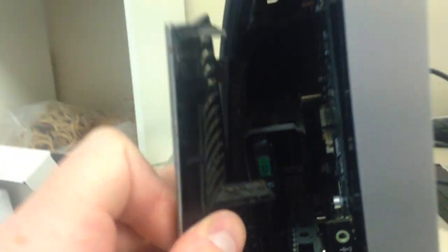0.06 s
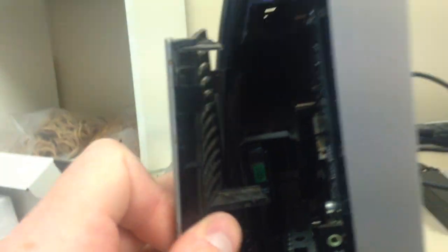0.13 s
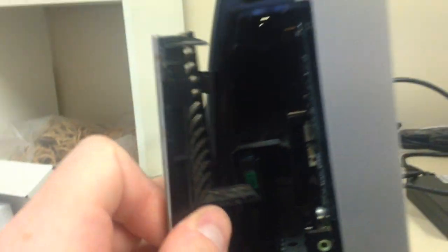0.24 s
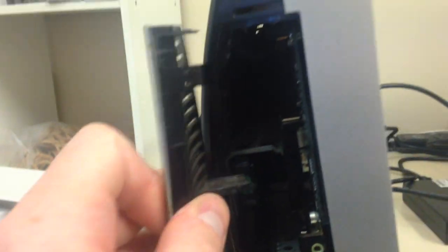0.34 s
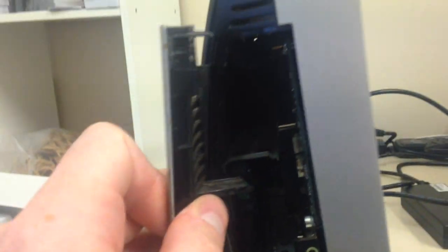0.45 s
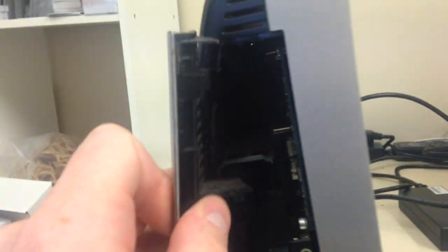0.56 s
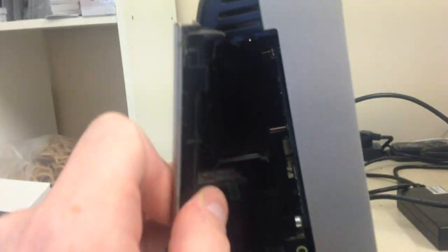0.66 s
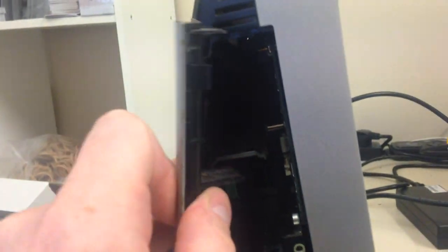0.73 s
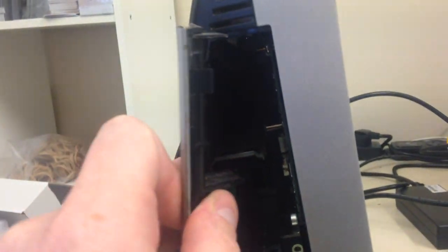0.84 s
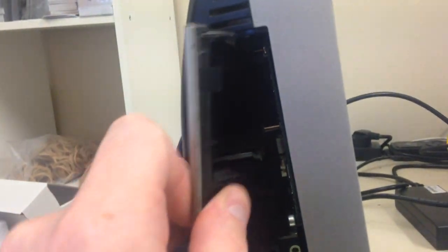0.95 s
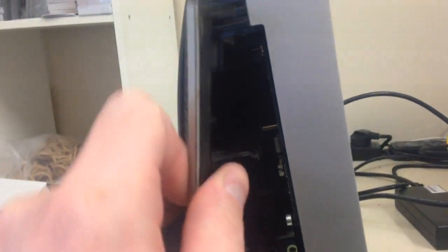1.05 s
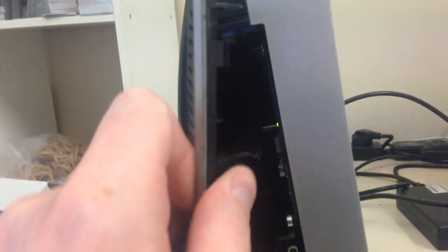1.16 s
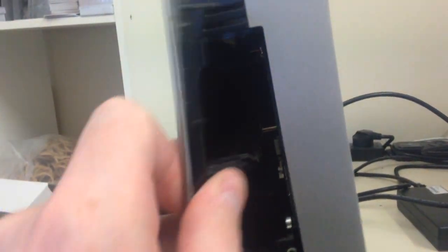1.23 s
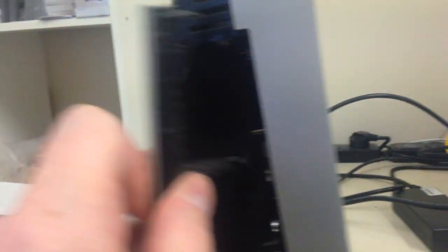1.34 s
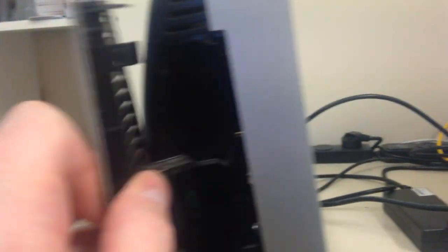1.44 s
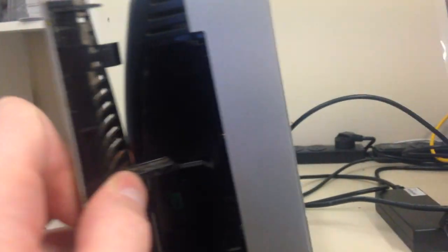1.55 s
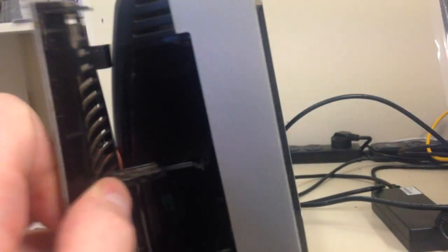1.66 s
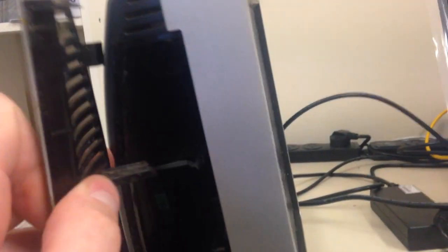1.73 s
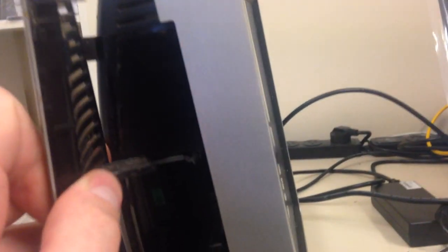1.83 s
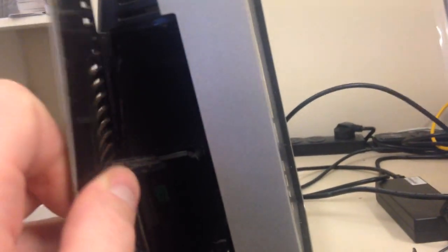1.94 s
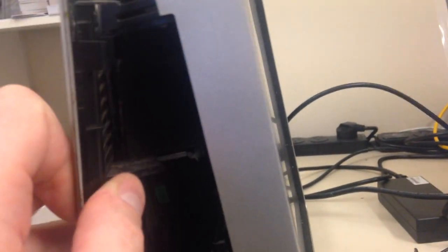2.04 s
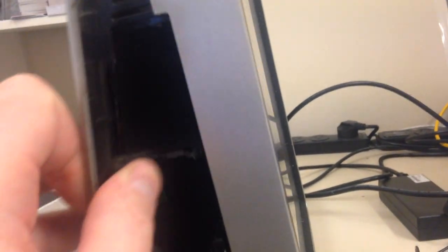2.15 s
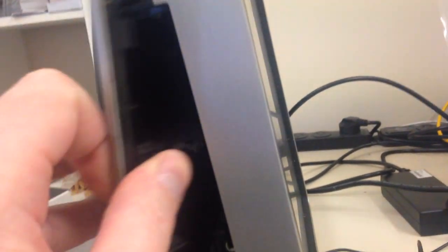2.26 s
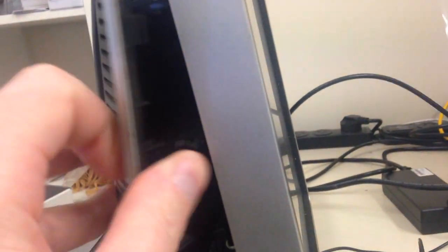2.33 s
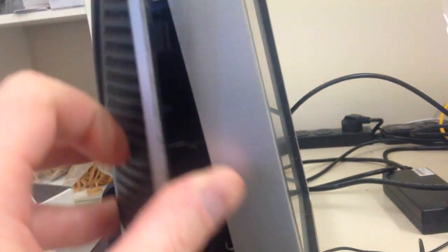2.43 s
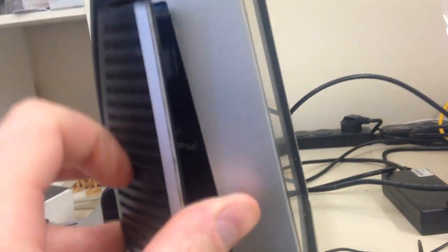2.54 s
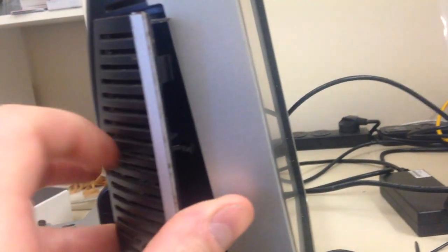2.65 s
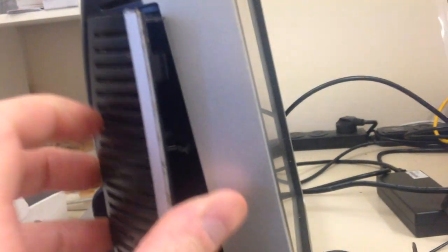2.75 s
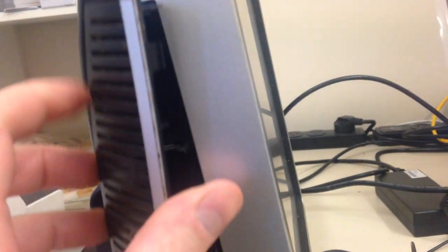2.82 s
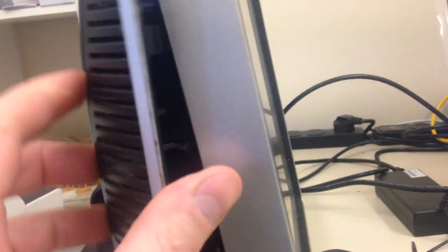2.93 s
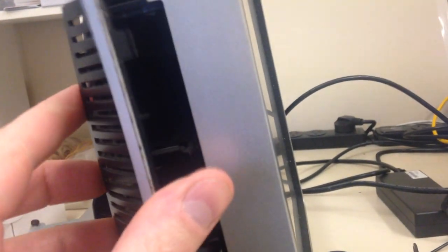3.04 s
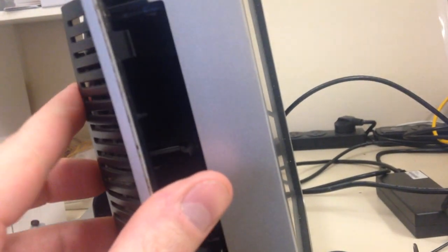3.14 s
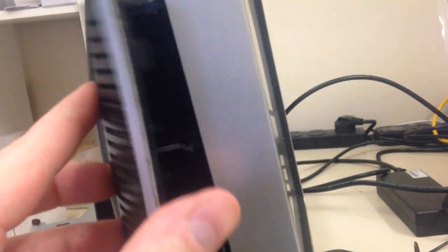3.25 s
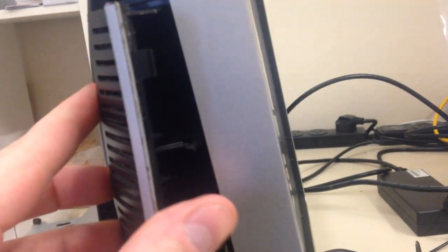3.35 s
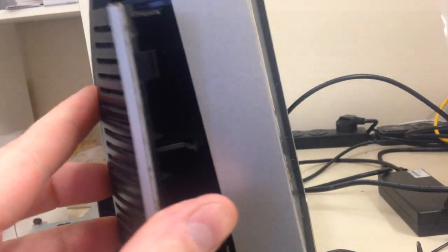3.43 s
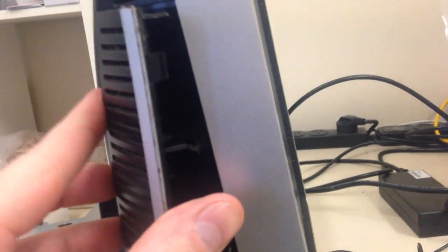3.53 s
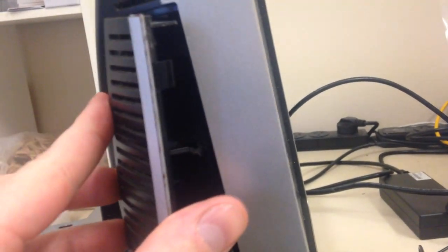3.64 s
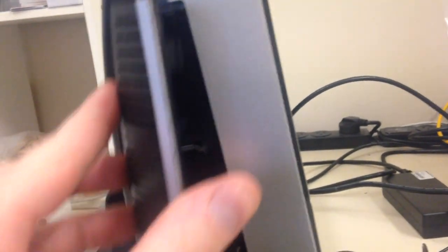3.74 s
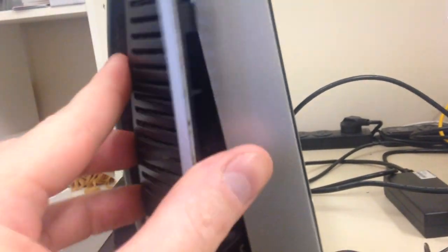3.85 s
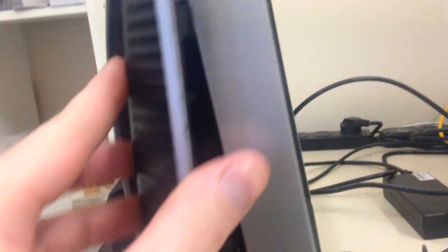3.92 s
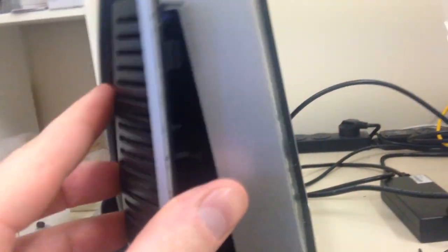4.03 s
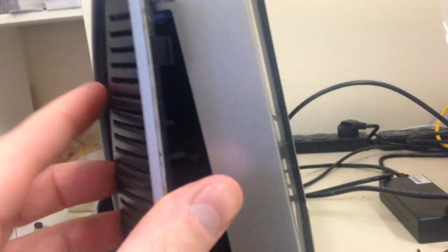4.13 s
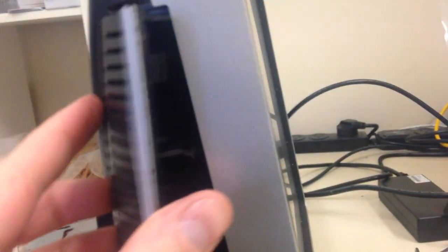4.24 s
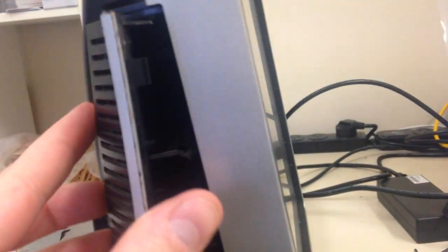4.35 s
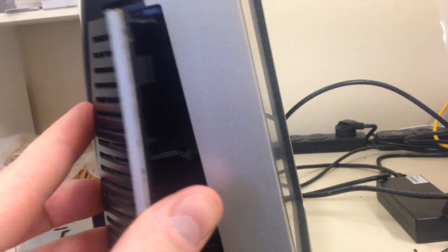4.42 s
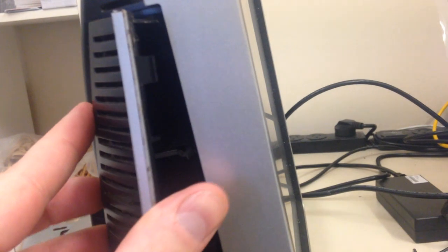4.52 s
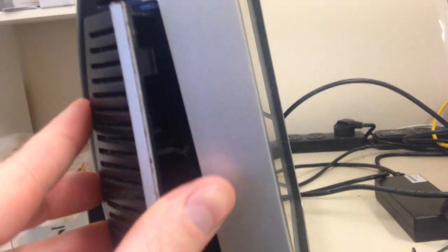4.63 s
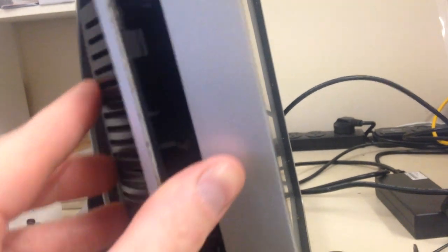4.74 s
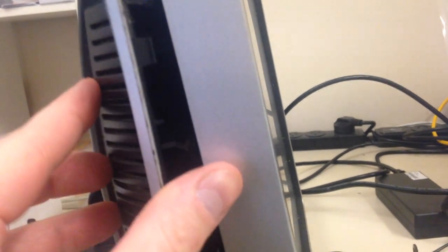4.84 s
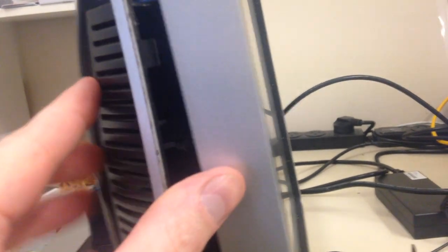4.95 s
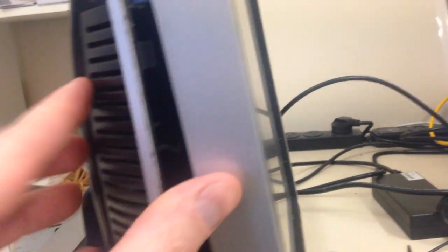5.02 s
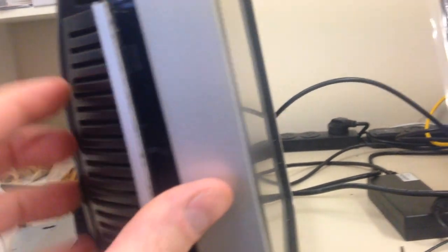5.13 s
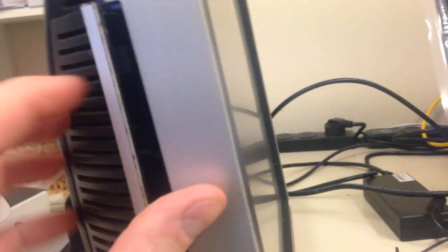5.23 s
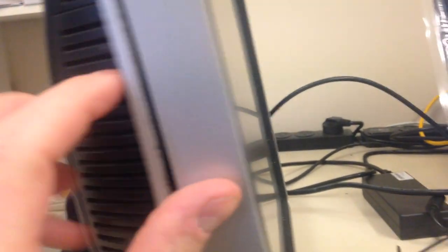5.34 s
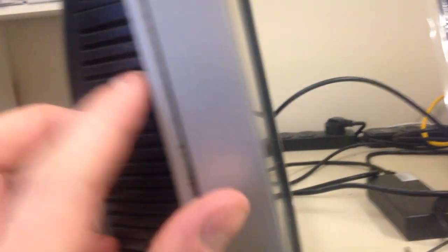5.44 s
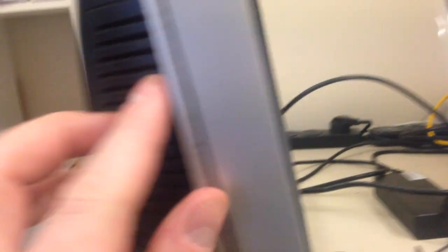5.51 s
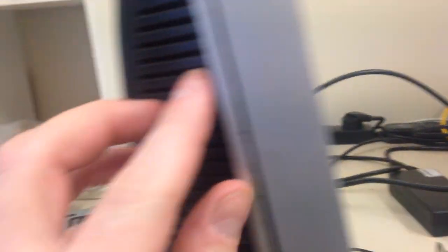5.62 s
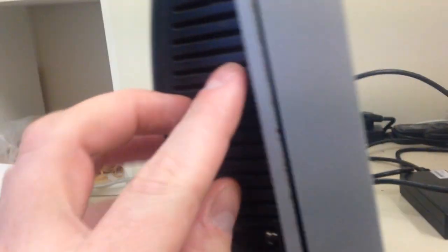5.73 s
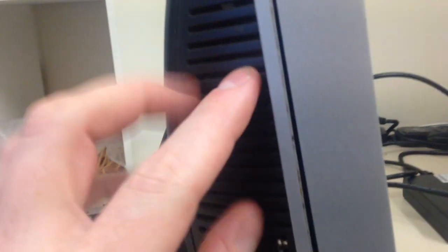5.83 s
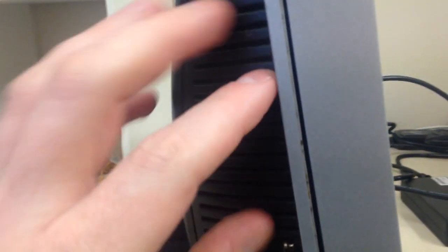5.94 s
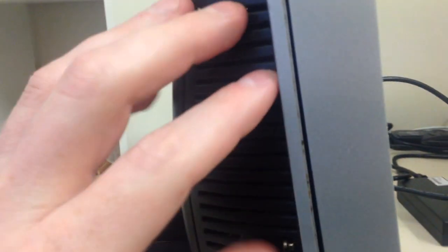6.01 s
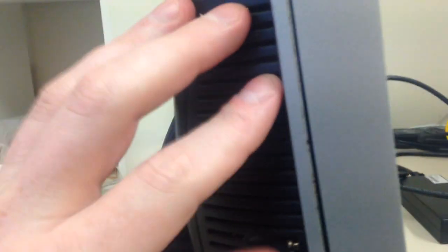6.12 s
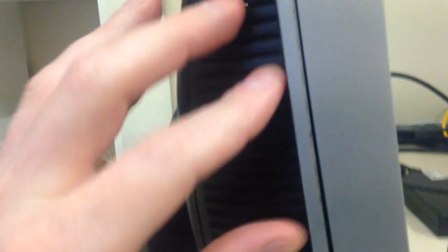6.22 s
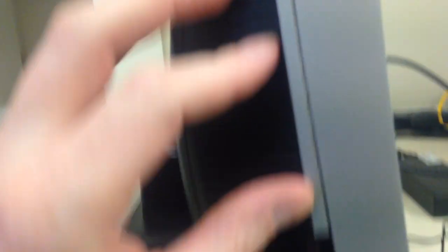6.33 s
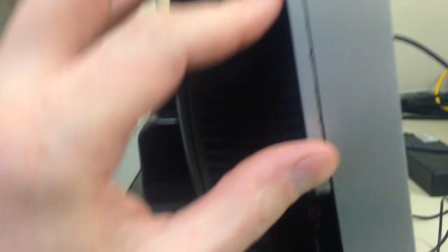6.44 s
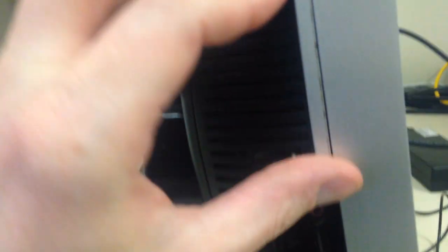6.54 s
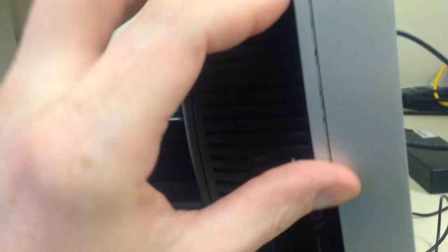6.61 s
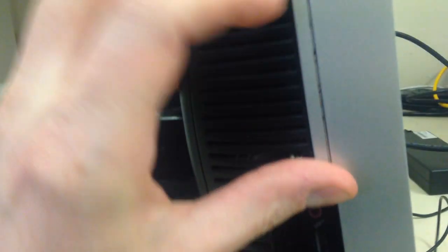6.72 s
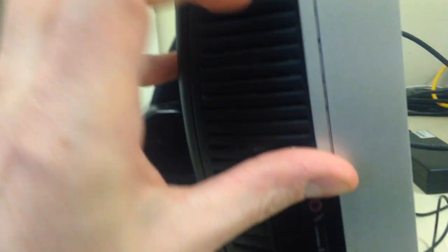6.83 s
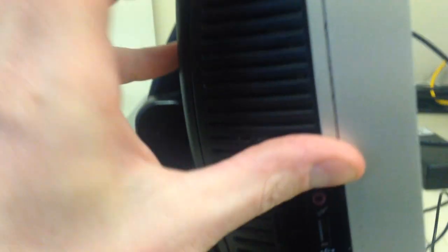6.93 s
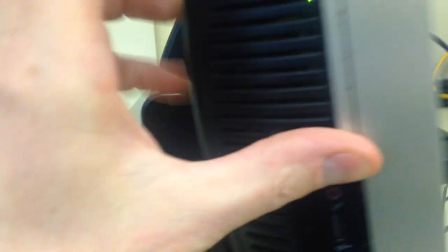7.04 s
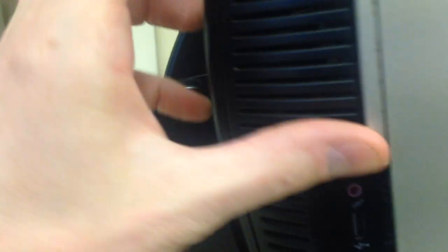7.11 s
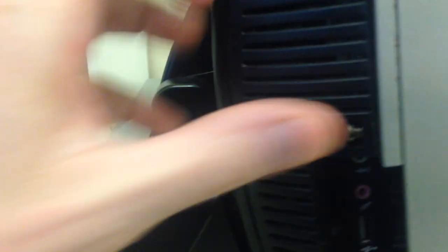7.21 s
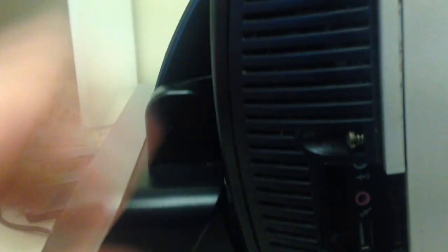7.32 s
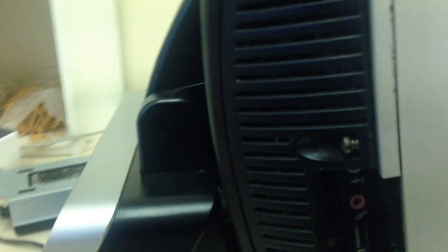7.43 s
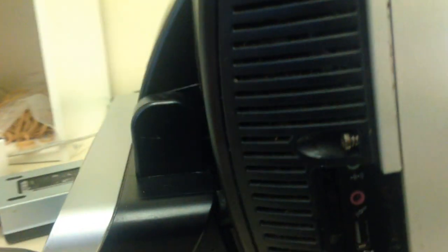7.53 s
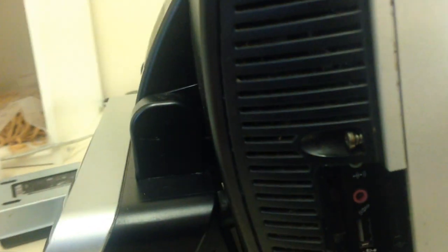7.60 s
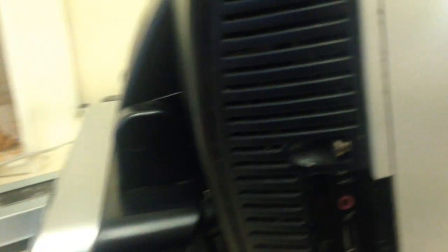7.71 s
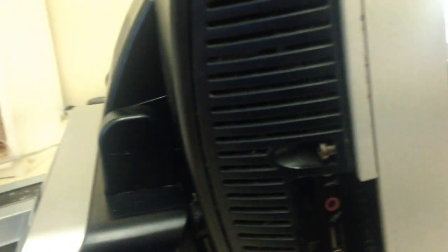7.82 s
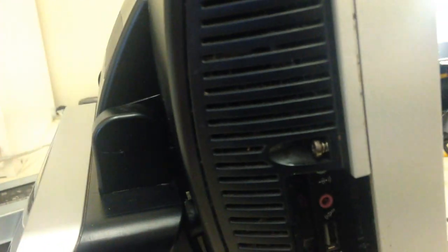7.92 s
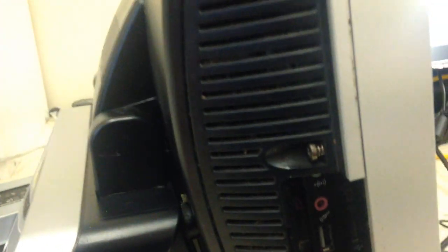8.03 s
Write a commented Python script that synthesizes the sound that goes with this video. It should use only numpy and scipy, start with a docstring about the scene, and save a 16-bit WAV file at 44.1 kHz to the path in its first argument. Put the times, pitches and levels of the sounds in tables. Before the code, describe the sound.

A hand works a plastic cover onto a computer case, heard by a close microphone with short room reflections. Dry ticks, brief scrapes and soft skin rubs come unevenly, growing into strong clacks with dull casing thumps as it is pressed home. After the last clicks only low room noise, a slowly beating hum and a faint distant bump remain.

```python
"""A soft whir and light scraping come first: a plastic side panel is slid onto a computer casing and pressed home.
Scrapes are trains of tiny stick-slip pushes; each click is one sharp push after a faint, quickly swelling noise.
Both excite damped panel modes; thumps are decaying sines of the swaying casing.
Finger rubbing and scuffs are coloured, modulated noise.
Dull bumps, a faint beating hum and room noise lie underneath, in a small close-sounding room."""
import sys
import numpy as np
from scipy import signal
from scipy.fft import rfft, irfft, next_fast_len
from scipy.io import wavfile
from scipy.ndimage import uniform_filter1d, map_coordinates

SR = 44100
rng = np.random.default_rng(int(sys.argv[2]) if len(sys.argv) > 2 else 0)


def inscribe(sig):
    """Save sig as 16-bit PCM at rate SR to the path in sys.argv[1].

    A 1-D sig is mono; a 2-D sig holds one channel per row.
    Samples are clipped to [-1, 1] before scaling.
    """
    pcm = np.round(np.clip(np.atleast_2d(sig).T, -1, 1) * 32767)
    wavfile.write(sys.argv[1], SR, pcm.astype(np.int16))


N = 355887

# Levels in the event tables are relative: each layer may add its own trim.
# spectra of noise, later scaled to a common rms: pitch_hz, density_db (relative, per Hz)
AIR_COLOUR = [(28, -35), (45, -1), (64, -13.5), (84, 1.5), (105, -2.5), (145, -9), (210, -13), (300, -15),
              (500, -19.5), (850, -25.5), (1700, -29), (4000, -38.5), (10000, -42.5), (15500, -45.5)]
WHIR_COLOUR = [(90, -23), (150, 0), (300, 5.5), (560, -11), (800, -7), (1500, -7.5), (1950, -13),
               (2850, -12), (3250, -24), (3850, -28), (4300, -10.5), (4900, -25), (9000, -33), (14000, -65)]
RUB_COLOUR = [(350, -9), (640, -2), (880, 8.5), (1050, -11.5), (1290, -4.5), (1600, -8.5), (1950, -5.5),
              (2400, -12.5), (3000, -9.5), (3400, -14), (6200, -17), (8000, -20.5), (15500, -31)]
SKIN_COLOUR = [(400, -10), (900, 9), (1500, -2), (2900, 2), (4500, -2), (7500, -3), (9000, -9.5),
               (12000, -11), (15500, -16)]
BUMP_COLOUR = [(150, -35), (400, 3.5), (800, 4.5), (1400, -8), (2200, -8.5), (3000, -31), (8000, -43)]
# soft whir, nearly steady for half a second and then dying away: time_s, level_db (rms)
WHIR_LEVEL = [(0, -60.5), (.3, -58.5), (.55, -62), (.9, -79), (1.3, -100)]
# low hum, the first row beating: pitch_hz, level_db (peak of one sine)
HUM_TONES = [(48.2, -58), (98, -74), (197, -68)]
# decay of the small room: pitch_hz, t60_s
ROOM_DECAY = [(150, 0.54), (900, 0.36), (2500, 0.34), (7000, 0.24), (15000, 0.22)]
# dull bumps farther off in the room: start_s, level_db, t60_s
BUMPS = [(7.756, -52, 0.48), (7.93, -59, 0.14)]
# the hand shifting on the panel: time_s, level_db
HAND_RUB = [(0, -68), (.75, -86), (1.45, -59), (1.85, -81), (2.2, -68), (3.25, -64.5), (3.62, -78.5),
            (4.1, -72), (5.6, -68), (5.93, -79), (6.55, -68), (6.92, -56), (7.4, -71.5), (8.07, -94)]
# light scuffs of skin on plastic: start_s, length_s, level_db
SCUFFS = [(0.562, 0.017, -58), (1.08, 0.086, -63), (2.421, 0.099, -62), (2.53, 0.2, -67.5),
          (2.723, 0.1, -65), (2.864, 0.064, -68), (2.938, 0.2, -64.5), (3.286, 0.081, -64),
          (4.015, .1, -58.5), (5.903, 0.087, -68.5), (6.078, 0.044, -63), (7.339, 0.025, -66.5),
          (7.431, .04, -64)]
# soft pushes that rock the casing: start_s, level_db, pitch_hz
THUMPS = [(1.24, -42, 180), (3.946, -44, 245), (4.513, -45, 260), (4.838, -36, 187), (4.933, -31.5, 139),
          (5.411, -34, 195), (5.425, -40.5, 104), (5.458, -35, 193), (5.499, -38.5, 200), (6.134, -42, 174),
          (6.3, -42, 164), (6.423, -34, 141), (6.746, -47, 191), (6.855, -45, 181), (7.09, -40, 83.4),
          (7.114, -34.5, 98.8)]
# resonances of the plastic: pitch_hz, width_hz, gain_db (before the scatter with place)
PLASTIC_MODES = [(354, 51, -0.5), (436, 39, 3), (1285, 90, -2), (1447, 82, -1), (1720, 69, -10),
                 (1890, 39, -10), (2330, 17, -7.5), (2774, 54, 3), (3106, 180, 1.5), (3485, 98, -4),
                 (3770, 116, -8.5), (4140, 210, -11), (4760, 20, -24), (4970, 41, -9), (5556, 56, -34)]
# how tightly the panel sits in the casing: time_s, tightness (0 loose to 1 seated)
SEATING = [(4.1, 0), (4.8, 0.4), (5.45, 0), (5.8, 0.56)]
# sliding strokes: peak_s, rise_s, fall_s, strength_db, edge_tick_db, knock_db (last two over the strength)
SCRAPES = [(.105, .045, 0.034, -44.5, -20.5, -7.5), (.395, 0.019, 0.029, -54.5, -18.5, 0),
           (.445, .023, .049, -47.5, -20, -7), (0.484, 0.026, 0.028, -49, -14, -3),
           (0.702, 0.017, 0.051, -52.5, -10, -3), (1.14, 0.044, .022, -51.5, -20, -4),
           (1.172, .023, 0.032, -52, -11, 7), (1.286, .005, .012, -43, -32, -19),
           (1.307, .028, 0.019, -30.5, -8.5, -13.5), (1.345, 0.018, 0.045, -41.5, -40, -26),
           (1.378, 0.0083, 0.028, -46.5, -14.5, -14), (1.468, 0.028, 0.048, -50, -20, 2.5),
           (2.073, 0.017, 0.031, -41.5, -23.5, -17), (2.624, .034, 0.056, -43, -7, -1),
           (3.091, .03, 0.0085, -43, -1.5, -7), (3.11, .013, 0.013, -43, -8, -17),
           (3.925, .083, 0.059, -50.5, -2, -2), (4.309, 0.017, 0.039, -67.5, 3.5, -6),
           (4.784, .012, 0.0085, -50.5, 1, 9), (4.831, 0.046, 0.039, -33.5, -15.5, -2.5),
           (5.193, .012, 0.0091, -54, 0, 15), (5.952, 0.013, 0.0067, -42, -13, 1),
           (6.455, 0.029, 0.0089, -36.5, -13, 5)]
# tabs and edges striking: strike_s, strength_db, edge_tick_db, knock_db (both over the strength), ring_hz
CONTACTS = [(.031, -56, -6, -1, 857), (.335, -62.5, -6, 4, 920), (.569, -71.5, 3.5, 9, 890),
            (0.762, -48.5, -25, -11, 816), (0.899, -45, -20, -11, 738), (1.082, -62.5, -9, 4, 885),
            (1.178, -58.5, 5, -6, 900), (1.2487, -41, -19, 1, 872), (1.31, -41, -18, -15, 914),
            (1.367, -47.5, -5, 3, 820), (1.403, -69, 9, -6, 885), (1.5521, -62, -15, -2, 870),
            (1.7451, -41, -5, -12.5, 900), (1.998, -53, -59, -6, 887), (2.0349, -59, -4.5, 9, 930),
            (2.1442, -47.5, -12.5, -10, 770), (2.239, -70, -7, 8, 680), (2.616, -45.5, -12, -3, 830),
            (2.636, -46, -22, -2, 800), (3.097, -43.5, -10, -16, 888), (3.158, -43, -21, -22, 883),
            (3.166, -44.5, -36, -13, 874), (3.357, -63, 2, 6.5, 730), (3.4999, -48.5, -21, 1.5, 856),
            (3.548, -47.5, -33, -9, 740), (3.682, -50.5, -30, -18, 926), (3.701, -57, -11, -5, 730),
            (3.8793, -56.5, -19, 1, 883), (3.924, -52.5, -1, -14, 907), (3.9444, -50.5, -9, 6, 840),
            (4.306, -61.5, -9, -11, 870), (4.398, -55.5, 10.5, 13, 896), (4.468, -60, 1, -1, 850),
            (4.516, -68, -4, 18, 910), (4.554, -57.5, -32, -16, 840), (4.8356, -46, 3.5, -4, 740),
            (4.8439, -33, -15, 4.5, 760), (4.9277, -32, -15, -20, 897), (4.9302, -24, -20.5, -9.5, 880),
            (4.954, -50.5, -3, 10.5, 950), (5.1951, -38, -41, 0, 880), (5.327, -57, 5, 8, 913),
            (5.364, -46, 4, 11, 696), (5.3953, -39.5, 0, 0, 819), (5.413, -41, -5, 4.5, 847),
            (5.4215, -38, -25, -16, 792), (5.4576, -43.5, -3.5, 3, 843), (5.501, -72.5, 21, 11, 840),
            (5.5246, -48, -5, -27, 878), (5.531, -52, -24, 3.5, 697), (5.902, -82, 15, 1, 820),
            (6.0652, -63, -18, 4, 917), (6.1285, -38.5, -3.5, 2, 899), (6.288, -53, -10.5, 2, 760),
            (6.3111, -50, -18, 2.5, 876), (6.379, -64, -42, 19.5, 760), (6.417, -43, -3, -14, 853),
            (6.4219, -25, -6, -6, 817), (6.4261, -29, -10, -7.5, 902), (6.47, -43, -3, -8, 764),
            (6.7425, -38, -19, -1.5, 830), (6.828, -46.5, -9, -2, 787), (6.89, -56, -27, 11.5, 800),
            (6.926, -38.5, -17, 3.5, 720), (6.9342, -39.5, -15, 1, 805), (7.057, -46.5, -12, 1, 790),
            (7.093, -59.5, -4, 10.5, 920), (7.124, -62, 8, 4, 850), (7.1356, -41, 3, -1.5, 850),
            (7.4362, -75, 1, 17, 860)]
# latches of the seated panel springing home: strike_s, strength_db
LATCHES = [(6.5017, -40), (6.8062, -45.5), (6.8534, -48.5)]
# voice of every latch: knock_db, ring_db, crack_db, edge_tick_db (all over the strength), ring_hz
LATCH_VOICE = (3, 11, 1, 2, 803)

# ranges in which the parts of a contact radiate: (low_hz, high_hz)
CLACK, KNOCK, CRACK, TICK, FIZZ = (1054, 2270), (220, 717), (1890, 6200), (4400, 9240), (9740, 14300)
AIR_DB, AIR_WAVER_DB = -59.5, -1.8  # room noise: level and slow waver
# rubbing around a stroke: level, reach in s, growth in dB per dB of stroke strength
STROKE_RUB_DB, STROKE_RUB_S, STROKE_RUB_GROWS = -73.5, 0.089, 0.15
# bending pitch in a stroke and its scatter with the grip (share)
LOOSE_HZ, SEATED_HZ, GRIP_SPREAD = 870, 826, 0.028
# a biting edge rings and crackles more (dB per dB of edge tick); seating damps the ring
SCRAPE_RING_DB, SCRAPE_RING_PER_EDGE, SEATED_RING_DB = 11.5, 0.26, -11.5
SCRAPE_CRACK_DB, SCRAPE_CRACK_PER_EDGE = 6.5, 0.75
# in a strike, a harder edge cracks more and a seated panel less
STRIKE_RING_DB, CRACK_DB, CRACK_PER_EDGE, SEATED_CRACK_DB = 1, 4, 0.26, -8.5
# per dB of strength over a typical contact, ring and crack fall behind the clack
YIELD_PER_DB, TYPICAL_DB = -0.1185, -43
TOP_HZ = 15600  # upper band limit, 3 dB down


def amp(db):
    """Amplitude ratio: decibels become linear gain."""
    return 10 ** (np.asarray(db) / 20)


def unit(x):
    """Power normalisation: scale to rms 1."""
    return x / np.sqrt(np.mean(x ** 2) + 1e-20)


def burst(x):
    """Energy normalisation: each row gets the energy of 10 ms at rms 1."""
    energy = np.sum(x ** 2, axis=-1, keepdims=True)
    return x * np.sqrt(.01 * SR / (energy + 1e-20))


def along(points, hz):
    """Logarithmic frequency scale: read (Hz, value) points between their knots."""
    f, v = np.transpose(points)
    return np.interp(np.log(hz + 1), np.log(f), v)


def curves(rows):
    """Linear interpolation in time: one value per sample for each column after the time."""
    s, *cols = np.transpose(rows)
    return [np.interp(np.arange(N) / SR, s, c) for c in cols]


def wobble(rate):
    """Band-limited fluctuation: a smooth random curve with rate knots a second."""
    knots = rng.standard_normal(int(N * rate / SR) + 4)
    return map_coordinates(knots, [np.arange(N) * rate / SR], order=2)


def filtered(x, response):
    """Linear filtering: the spectrum of x times a response of frequency."""
    m = next_fast_len(len(x) + SR // 10)
    return irfft(rfft(x, m) * response(np.fft.rfftfreq(m, 1 / SR)), m)[:len(x)]


def coloured(x, spectrum):
    """Spectral shaping: x weighted by (Hz, dB) points, at rms 1."""
    return unit(filtered(x, lambda hz: amp(along(spectrum, hz))))


def patchy(depth_db):
    """Time-varying colour: noise drifts in spectrum, as when a finger moves over ribs and edges."""
    z = signal.stft(rng.standard_normal(N), nperseg=512)[2]
    field = uniform_filter1d(rng.standard_normal(z.shape), 3, 0)  # smooth over frequency
    field = uniform_filter1d(field, 16, 1)  # smooth over time
    return signal.istft(z * amp(depth_db * unit(field)), nperseg=512)[1][:N]


def add(track, s, sound):
    """Superposition: mix a sound into the track at time s."""
    start = max(round(s * SR), 0)
    track[start:start + len(sound)] += sound[:N - start]


def band(edges, hz, order=3):
    """Causal resonant band: a Butterworth band-pass response."""
    low, high = np.sort(edges)
    detune = 1j * (hz - low * high / (hz + 1)) / (high - low)
    return 1 / np.prod([detune - pole for pole in signal.buttap(order)[1]], axis=0)


def background():
    """Stationary and decaying noise: wavering room noise plus the fading whir."""
    whir_db, = curves(WHIR_LEVEL)
    air = amp(AIR_DB + AIR_WAVER_DB * wobble(1.41)) * coloured(rng.standard_normal(N), AIR_COLOUR)
    whir = amp(whir_db) * coloured(rng.standard_normal(N), WHIR_COLOUR)
    return air + whir


def hum(depth=0.93):
    """Beating: two nearly equal low tones interfere; weak overtones keep their level but drift in phase."""
    t = np.arange(N) / SR
    beat_hz, quiet_s = .532, 1.64  # the tones oppose each other at quiet_s
    (low_hz, low_db), *overtones = HUM_TONES
    second_turns = low_hz * t + beat_hz * (t - quiet_s)
    beating = np.sin(2 * np.pi * low_hz * t) - depth * np.sin(2 * np.pi * second_turns)
    steady = sum(amp(db) * np.sin(2 * np.pi * hz * t + 1.06 * wobble(3.1)) for hz, db in overtones)
    return amp(low_db) * beating + steady


def room_tails(count=12):
    """Diffuse reverberation: noise decays at a rate set by frequency; each tail has energy 1."""
    hz, t, z = signal.stft(rng.standard_normal((count, SR // 3)), SR, nperseg=256)
    decay = amp(-60 * t / along(ROOM_DECAY, hz)[:, None])
    tails = signal.istft(z * decay, SR, nperseg=256)[1]
    tails = tails * (1 - np.exp(-(np.arange(tails.shape[1]) / SR / 0.00077) ** 2))
    return tails / np.linalg.norm(tails, axis=1, keepdims=True)


def in_room(near, far, tails, wet_db):
    """Direct and reverberant field: near sound first, then the room's answers to both panel faces."""
    chosen = tails[rng.permutation(len(tails))[:2]]
    wet = signal.fftconvolve(np.array([near, far]), chosen, axes=1).sum(axis=0) / np.sqrt(2)
    return np.pad(near, (0, len(wet) - len(near))) + amp(wet_db) * wet


def bumps():
    """Diffuse arrival: distant bumps are dull noise with exponential decay."""
    track, t = np.zeros(N), np.arange(SR // 2) / SR
    for s, db, t60 in BUMPS:
        wash = coloured(rng.standard_normal(len(t)), BUMP_COLOUR)
        add(track, s, amp(db - 60 * t / t60) * wash * (1 - np.exp(-t / 0.00092)))
    return track


def rub_level():
    """Addition of powers: rubbing in dB from the shifting hand plus a swell around every stroke."""
    hand_db, = curves(HAND_RUB)
    t, usual_db = np.arange(N) / SR, np.mean([row[3] for row in SCRAPES])
    power = amp(hand_db) ** 2
    for s, _, _, db, _, _ in SCRAPES:
        swell_db = STROKE_RUB_DB + STROKE_RUB_GROWS * (db - usual_db)
        power = power + amp(swell_db) ** 2 * np.exp(-((t - s) / STROKE_RUB_S) ** 2)
    return 10 * np.log10(power)


def rubbing(rub_db, grain_db=3, waver_db=7.0):
    """Friction noise: the panel slides lightly in the hand, with a fine grain."""
    grains = patchy(depth_db=-3.5) * amp(grain_db * wobble(500))
    return amp(rub_db + 0.5 + waver_db * wobble(25)) * coloured(grains, RUB_COLOUR)


def scuffs(grain_db=-1.5):
    """Transient sliding friction: fingertips let go, skid for a moment and grip again."""
    track, t = np.zeros(N), np.arange(SR // 4) / SR
    skin = coloured(patchy(depth_db=3.5) * amp(grain_db * wobble(400)), SKIN_COLOUR)
    for s, length, db in SCUFFS:
        speed = (1 - np.exp(-t / .005)) / (1 + (t / length) ** 6)
        add(track, s, amp(db) * speed * skin[round(s * SR):][:len(t)])
    return track


def thumps(t60=0.19):
    """Damped free oscillation: the whole casing sways for a few cycles after a push."""
    track, t = np.zeros(N), np.arange(SR // 3) / SR
    for s, db, hz in THUMPS:
        upper_hz = hz * rng.uniform(1.0, 2.0)
        sway = np.sin(2 * np.pi * hz * t) + .5 * np.sin(2 * np.pi * upper_hz * t)
        add(track, s, amp(db - 6.5) * sway * amp(-60 * t / t60) * (1 - np.exp(-t / 0.00084)))
    return track


def plastic_bands(size=4096, direct=0.55, place_db=2):
    """Modal coupling: each place of contact favours other resonances; responses run clack to fizz."""
    hz = np.fft.rfftfreq(size, 1 / SR)
    body = direct
    for centre, width, db in PLASTIC_MODES:
        loss = 1j * hz * width
        body = body + amp(db + place_db * rng.normal()) * loss / (centre * centre - hz * hz + loss)
    lower = [body * band(CLACK, hz, order=4), body * band(KNOCK, hz, order=2), body * band(CRACK, hz)]
    return lower + [band(TICK, hz), band(FIZZ, hz)]


def panel(force, voicing, size=3072):
    """Forced modal response: dense, quickly damped modes and a few clear bending modes."""
    clack_db, knock_db, ring_db, crack_db, tick_db, ring_hz = voicing
    t = np.arange(size) / SR
    # a soft contact loses its top octave first
    fizz_db = tick_db - 5.0 + 0.16 * (tick_db - crack_db)
    # clack, knock, crack, tick, fizz: level_db, t60_s, build_s; the heavy casing speaks last
    parts = [(0, .035, .0006), (knock_db, .042, .0042), (crack_db - 0.5, .029, .0005),
             (tick_db - 0.5, .025, .0003), (fizz_db, .022, .0002)]
    db, t60, build = np.transpose(parts)[:, :, None]
    modes = rng.standard_normal((len(parts), size)) * amp(-60 * t / t60)
    modes = modes * (1 - np.exp(-(t / build) ** 2))
    dense = irfft(rfft(modes) * plastic_bands(size=size))
    # the main bending mode, a weaker neighbour and an overtone all follow ring_hz
    main = np.sin(2 * np.pi * ring_hz * t) * amp(-60 * t / 0.055)
    neighbour_hz = ring_hz * rng.uniform(.86, 0.94)
    neighbour = 0.48 * np.sin(2 * np.pi * neighbour_hz * t + rng.normal()) * amp(-60 * t / 0.056)
    ring = (main + neighbour) * (1 - np.exp(-t / 0.0022))
    overtone = np.sin(2 * np.pi * 3.41 * ring_hz * t) * amp(-60 * t / 0.024)
    answers = burst(signal.fftconvolve(force[None], np.vstack([dense, ring, overtone]), axes=1))
    levels_db = np.vstack([db, [ring_db], [crack_db - 7]])
    return amp(clack_db) * np.sum(amp(levels_db) * answers, axis=0)


def seating(s):
    """Boundary condition: how tightly the panel sits at time s, 0 to 1."""
    return np.clip(np.interp(s, *np.transpose(SEATING)), 0, 1)


def stroke_voice(s, db, edge_db, knock_db):
    """Edge excitation and damping: a biting edge rings and crackles more; seating rings lower and less."""
    ring_db = SCRAPE_RING_DB + SCRAPE_RING_PER_EDGE * edge_db + SEATED_RING_DB * seating(s)
    crack_db = SCRAPE_CRACK_DB + SCRAPE_CRACK_PER_EDGE * edge_db
    ring_hz = LOOSE_HZ + (SEATED_HZ - LOOSE_HZ) * seating(s)
    ring_hz = ring_hz * (1 + GRIP_SPREAD * rng.normal())
    return db, knock_db, ring_db, crack_db, edge_db, ring_hz


def scrapes(tails, slips_per_s=950, spread_db=3.5, fade_db=17):
    """Stick-slip friction: a sliding edge moves in tiny uneven steps that swell and fade."""
    track = np.zeros(N)
    for s, rise, fall, db, edge_db, knock_db in SCRAPES:
        voicing = stroke_voice(s, db, edge_db, knock_db)
        t = np.arange(-rise, fall, 1 / SR)
        pressure = amp(-fade_db * np.maximum(-t / rise, t / fall))
        chance, size, sign = rng.random((3, SR // 4))[:, :len(t)]
        step = amp(-spread_db * np.log(size + 0.03)) * np.sign(sign - .5)
        force = (chance < slips_per_s / SR) * step * pressure
        near, far = panel(force, voicing), panel(force, voicing)
        add(track, s - rise, in_room(near, far, tails, wet_db=-11.0))
    return amp(-2.0) * track


def strike_voice(s, db, edge_db, knock_db, ring_hz):
    """Nonlinear contact: light strikes ring and crack, heavy ones clack; edge and seating shape the crack."""
    yield_db = YIELD_PER_DB * (db - TYPICAL_DB)
    crack_db = CRACK_DB + CRACK_PER_EDGE * edge_db + SEATED_CRACK_DB * seating(s)
    return db, knock_db, STRIKE_RING_DB + yield_db, crack_db + yield_db, edge_db, ring_hz


def strikes():
    """Impact excitation: (strike_s, voicing) of the tabs, edges and latches."""
    tabs = [(row[0], strike_voice(*row)) for row in CONTACTS]
    return tabs + [(s, (db, *LATCH_VOICE)) for s, db in LATCHES]


def clicks(events, tails, onset_db=-37, onset_s=0.0043):
    """Impact with a soft onset: a faint, quickly swelling noise leads into one sharp push."""
    track = np.zeros(N)
    before = np.arange(-(SR // 100), 1) / SR
    for s, voicing in events:
        force = amp(onset_db) * np.exp(before / onset_s) * rng.standard_normal(len(before))
        force[-1] = 1
        near, far = panel(force, voicing), panel(force, voicing)
        add(track, s + before[0], in_room(near, far, tails, wet_db=-10.0))
    return amp(-1.28) * track


def scene():
    """Superposition: background, hand, casing and panel sum at one microphone."""
    tails = room_tails()
    surroundings = background() + hum() + bumps()
    handling = rubbing(rub_level()) + scuffs() + thumps() + scrapes(tails) + clicks(strikes(), tails)
    return (surroundings + handling)[None]


def record(dry):
    """Band limitation: the response falls off steeply above TOP_HZ."""
    def low_pass(hz):
        return 1 / np.sqrt(1 + (hz / TOP_HZ) ** 160)
    return np.array([filtered(channel, low_pass) for channel in dry])


dry = scene()
out = record(dry)
inscribe(out)
```